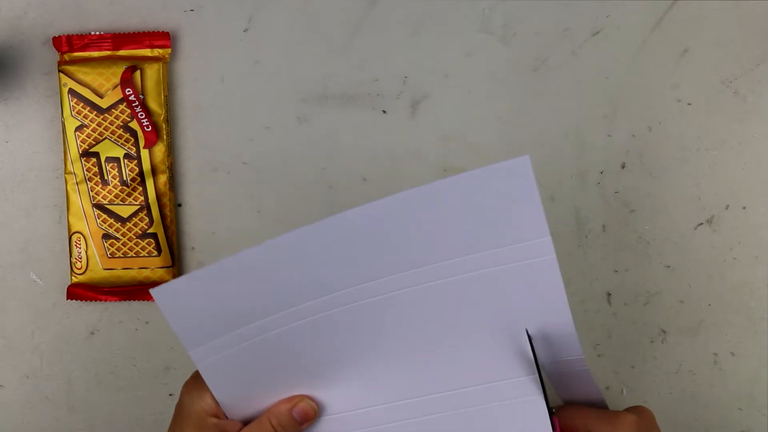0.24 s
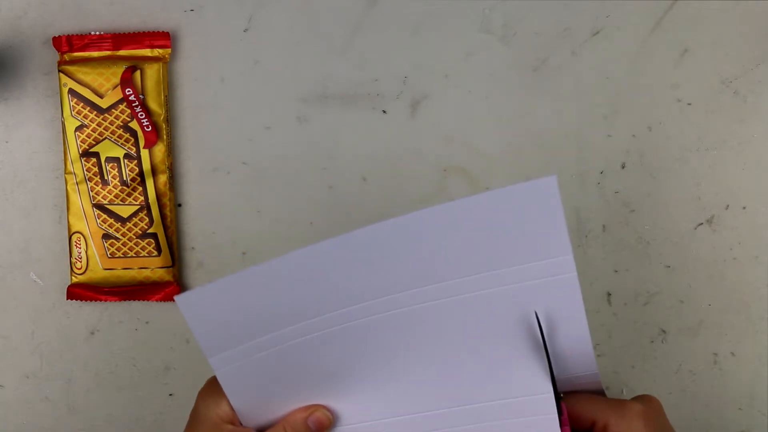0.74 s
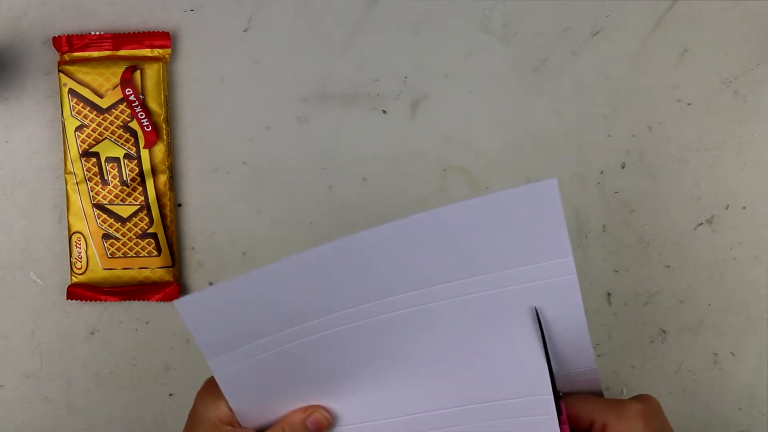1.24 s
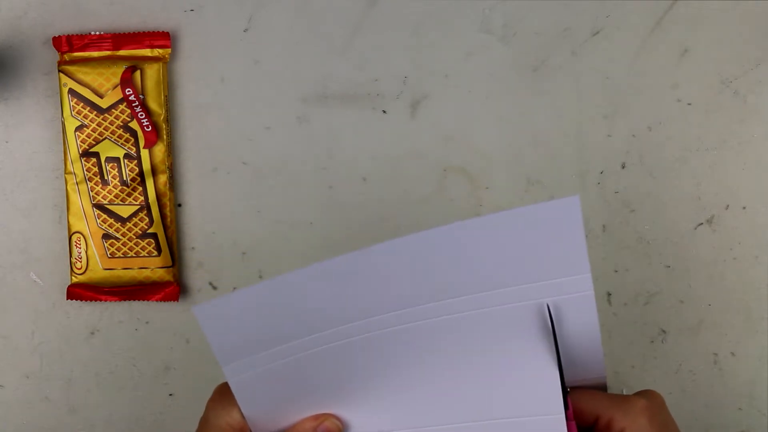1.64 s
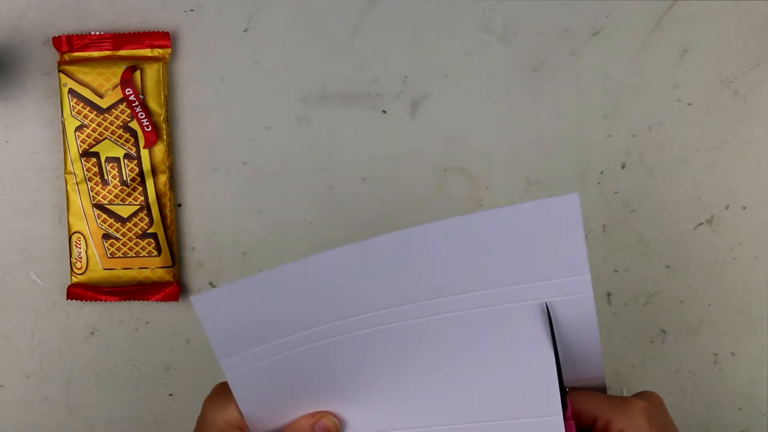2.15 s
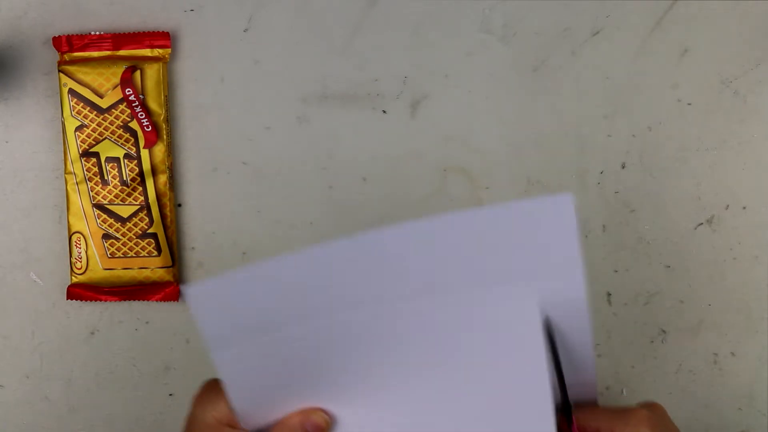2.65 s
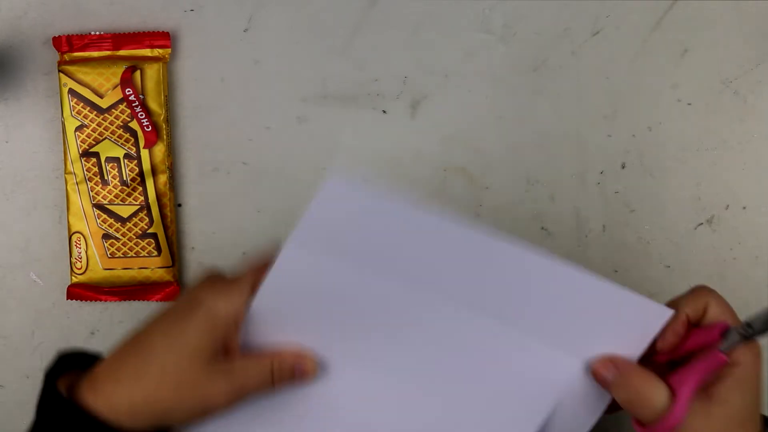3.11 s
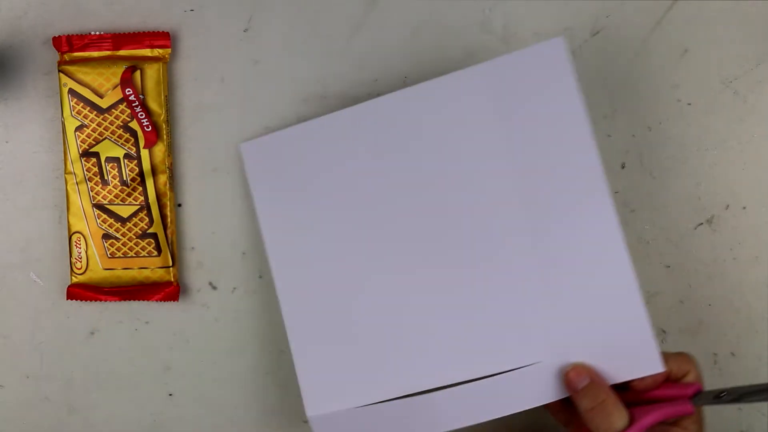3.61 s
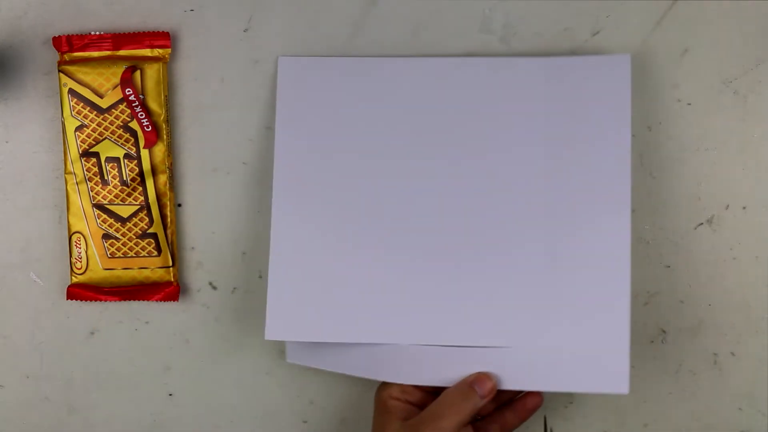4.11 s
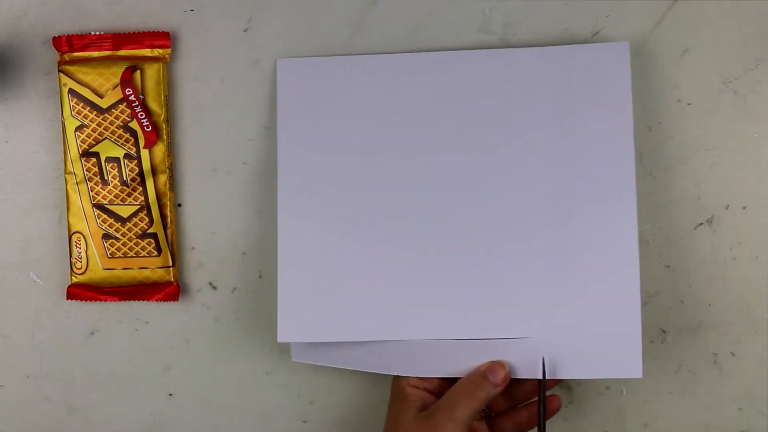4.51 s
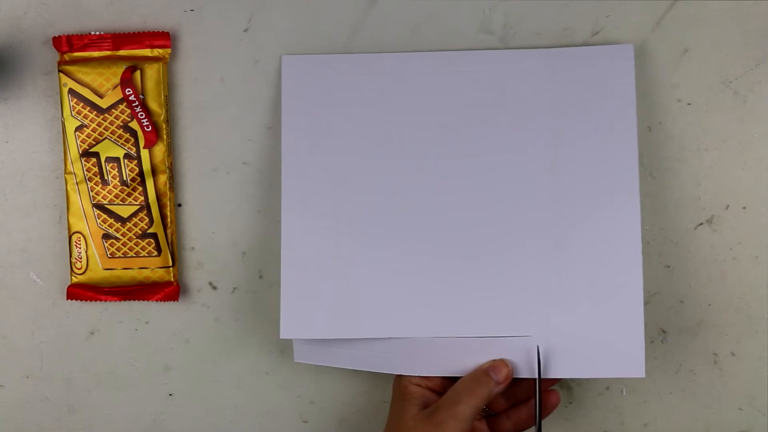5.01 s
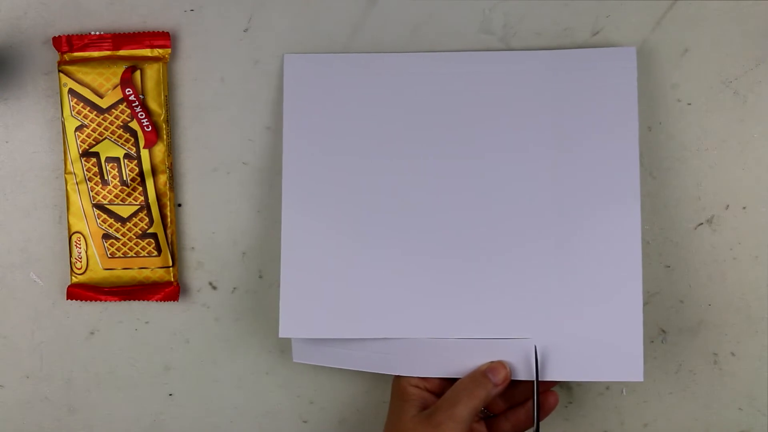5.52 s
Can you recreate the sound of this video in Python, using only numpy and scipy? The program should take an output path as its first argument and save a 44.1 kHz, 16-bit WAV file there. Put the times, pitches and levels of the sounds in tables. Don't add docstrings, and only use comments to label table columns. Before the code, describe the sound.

In a small quiet room, scissors cut stiff paper close to a stereo microphone. Faint scrapes and catches come first, then a rapid, dry creaking run, several separate snips and one much louder closing snap. Afterwards the sheet is turned with soft rustles and light ticks, then only low hiss and faint hum remain.

```python
import sys
import numpy as np
from scipy import signal
from scipy.fft import rfft, irfft, next_fast_len
from scipy.io import wavfile
from scipy.ndimage import uniform_filter1d

SR = 44100
rng = np.random.default_rng(int(sys.argv[2]) if len(sys.argv) > 2 else 0)


def undo_db(level):
    steps = np.asarray(level, float) / 20
    return 10 ** steps


def int16_out(signal):
    q = np.round(np.clip(np.atleast_2d(signal).T, -1, 1) * 32767)
    wavfile.write(sys.argv[1], SR, q.astype(np.int16))


N = 254016

# start_s, level_db (peak), pitch_hz (strongest mode), sharpness_db, length_s
CREAK_EVENTS = [(0.789, -26, 636, -16.5, 0.0037), (0.809, -24, 644, -13, .001),
                (0.814, -19.5, 674, -14, 0.0066), (0.834, -24.5, 697, -6, .003),
                (0.866, -26.5, 695, -11, 0.0018), (0.898, -27.5, 900, -10, 0.0056),
                (0.93, -26, 730, -7.5, 0.0011), (0.956, -21.5, 720, -13, 0.0051),
                (1.013, -20, 715, -9.5, 0.0054), (1.046, -19.5, 696, -28, .0019),
                (1.061, -21.5, 636, -7, 0.0039), (1.096, -16, 664, -10, .0015),
                (1.1005, -16, 800, -10, .002), (1.119, -20, 800, -18, 0.0032),
                (1.125, -21, 659, -7, 0.0036), (1.148, -16.5, 650, -5, 0.0035),
                (1.155, -21, 800, -16.5, .002), (1.162, -20.5, 645, -6, 0.0034),
                (1.174, -28.5, 940, -10, 0.0018)]
# start_s, level_db, pitch_hz, sharpness_db, length_s
SNIP_EVENTS = [
    (1.789, -20, 720, -12.5, 0.0071),
    (1.964, -17.5, 525, -11, .0045),
    (2.158, -19, 471, -9.5, 0.0062),
    (2.221, -22.5, 471, -9, 0.0056),
    (2.326, -18, 640, -9.5, .0025),
]
# start_s, level_db, pitch_hz, sharpness_db, length_s
TIPS_CLOSING = (2.4275, -8.5, 655, -13.5, .006)
# start_s, level_db, pitch_hz, #
# sharpness_db, length_s
CATCH_EVENTS = [(0.089, -34, 681, -11, 0.0053), (0.135, -31.5, 669.6, -25.5, 0.0084),
                (0.326, -41.5, 509, -21, .0024), (0.341, -31.5, 935, -18, 0.006),
                (0.381, -32, 651, -7, 0.0058), (0.393, -24, 596, -0.5, 0.0051),
                (0.611, -37, 650, -8, 0.0034), (1.3, -39, 654, -14, .004), (1.318, -34.5, 700, -14, 0.0033),
                (1.329, -26, 686, 7, 0.0027), (1.822, -28, 600, -13, .005),
                (1.989, -27.5, 490, -10, 0.0037), (2.009, -28.5, 466, -11.5, .0055)]
# start_s, level_db, pitch_hz, sharpness_db
FLICK_EVENTS = [
    (1.3618, -19.5, 664, -13),
    (2.672, -39, 635, -11),
    (2.699, -37, 700, -14),
    (3.143, -34.5, 962, -2),
    (3.534, -38, 1050, -37),
    (3.705, -36.5, 974, -19),
    (3.8115, -28, 854, -1),
    (3.917, -29, 1235, -15),
]
# offset_db, slope_db_per_db
CREAK_CRACK = (-21, 0.39)
CATCH_CRACK = (-4, 1.26)
SNIP_CRACK = (1.6, 2.03)
TIPS_CRACK = (-2, .9)
FLICK_CRACK = (0.5, 1)

# start_s, rise_s, hold_s, rub_db, fizz_db
BLADE_STROKES = [(0.009, .002, .005, -65, -11), (0.081, 0.011, 0.074, -41, -25),
                 (0.257, 0.033, 0.0046, -48.5, -32), (0.318, 0.033, 0.0077, -40, -32),
                 (0.374, 0.017, 0.0023, -22, -15), (0.426, 0.034, 0.057, -41, -0.5),
                 (0.51, 0.013, 0.057, -39.5, -4.5), (0.603, 0.01, .004, -43, -0.5),
                 (0.8, .04, .03, -50, -3), (0.94, .016, .01, -54, -5), (1.01, 0.0043, 0.00092, -29, -15),
                 (1.03, .13, .002, -34.5, -4), (1.315, 0.013, .08, -34.5, -7.5),
                 (1.399, 0.024, 0.0023, -30, -14), (2.656, 0.017, .005, -50, 3.5),
                 (2.693, 0.0088, 0.058, -40.5, -5)]
# start_s, rise_s, hold_s, rub_db, fizz_db
FINGER_RUSTLES = [(2.903, 0.045, .08, -77.5, 10.5), (3.086, 0.017, 0.033, -46.5, -6.5),
                  (3.148, 0.059, .002, -41, -3), (3.29, .02, .005, -54, 1), (3.379, 0.055, .005, -63, 0.5),
                  (3.45, 0.032, .005, -53.5, -12.5), (3.613, 0.012, 0.076, -55.5, -3)]
# start_s, rise_s, hold_s, rub_db, fizz_db
FINGER_GRIPS = [(3.526, .006, .006, -48, -16), (3.727, 0.039, 0.0017, -39.5, -3.5),
                (3.8, 0.0088, 0.054, -49, -5.5), (3.917, .003, .008, -41, -18),
                (3.98, .005, .02, -40.5, -11.5), (4.03, 0.013, 0.036, -63.5, -2)]
# start_s, rise_s, hold_s, rub_db, fizz_db
SHEET_WOBBLES = [(0.325, 0.016, 0.017, -62, -20), (0.38, 0.0097, .025, -60, -18),
                 (0.461, 0.011, .015, -59, -20), (3.138, .015, 0.027, -57, -18),
                 (3.22, .02, 0.068, -63, -20)]
# rise_db, release_db_per_s, mid_db, mid_per_fizz_db, flap_db, flap_per_fizz_db
BLADE_TOUCH = (26.5, 620, -2.5, 0.42, -11.5, 2.3)
LOOSE_TOUCH = (19, 446, 2, 0.87, -4, 0.4)
TAUT_TOUCH = (25.5, 797, 1.5, 0.46, -5, 0.6)
WOBBLE_TOUCH = (20, 500, -20, .1, 10, -0.04)

# pitch_hz, width_hz, level_db
FLAP_MODES = [(191, 21, -1.5), (256, 35, -2.5), (374.5, 42, 3.5)]
LOW_MODES = [(423, 44, -9), (471, 74, -1.5), (526.7, 73, -5.5), (580, 97, -13), (627.7, 74, 0),
             (697, 91, 1), (800, 84, -2.5), (934.6, 70, -0.5), (1030.5, 95, 1), (1037, 53, -4),
             (1235, 94, -1)]
MID_MODES = [(1400, 190, -1.5), (1656, 110, -3), (1804, 100, -4), (2073, 100, -2), (2344, 140, -3.5),
             (2230, 170, 1), (2460, 120, -6.5), (2757, 200, -1.5)]
# pitch_hz, level_db
FIBRE_COLOUR = [(2400, -25), (3100, 3.5), (3500, 4), (4200, -1.5), (4900, -4.5), (5800, -8), (7000, -11.5),
                (8100, -8.5), (10000, -15), (13000, -23), (16000, -33)]
# start_s, level_db, decay_s
BLADE_BRUSH = (3.696, -70, .016)
# pitch_hz, width_hz, level_db
STEEL_MODES = [(10500, 250, -2), (11800, 900, -4), (13300, 1200, 0), (14800, 1200, 0)]

# pitch_hz, t60_s
ROOM_DECAY = [(250, 0.28), (700, 0.19), (2000, 0.23), (5000, 0.22), (12000, 0.28)]
# start_s, level_db
TABLE_THUDS = [(0.07, -62), (1.41, -57), (2.43, -64), (3.635, -58.5), (3.97, -65)]
# pitch_hz, level_db (per Hz)
HISS_COLOUR = [(15, -21.5), (30, -16), (50, -7), (90, -5.5), (140, -10), (190, -3), (260, -8), (600, -9),
               (1700, -13.5), (5000, -17), (10000, -21.5), (16000, -26.5)]
# pitch_hz, likeness (0 to 1)
HISS_LIKENESS = [(60, 0.8), (150, 0.48), (380, 0.064), (950, 0.0045), (2380, 0), (5980, -0.0),
                 (15000, -0.0)]


def evened(x):
    return x / np.sqrt(np.mean(x ** 2) + 1e-20)


def peaked(x):
    return x / np.max(abs(x))


def read(points, hz):
    f, value = np.transpose(points)
    return np.interp(np.log(hz + 1), np.log(f + 1), value)


def add(mix, s, sound):
    part = mix[round(s * SR):][:len(sound)]
    part += sound[:len(part)]


def high_pass(x, hz):
    return signal.sosfilt(signal.butter(2, hz, "high", fs=SR, output="sos"), x)


def ring(modes, favoured_hz=None, lean_db=8.5, detune=0.0093, damping=0.92, rise_s=0.00083,
         boost_db=0., spin=np.pi):
    hz, width, db = np.transpose(modes)[:, :, None]
    hz = hz * (1 + detune * rng.standard_normal(hz.shape))
    if favoured_hz:
        apart = abs(np.log2(hz / favoured_hz))
        db = db - lean_db * apart + boost_db * (apart == apart.min())
    t = np.arange(2500) / SR
    phase = spin * np.arange(len(modes))[:, None]
    soft = 1 - np.exp(-(t / rise_s) ** 2)
    decay = np.exp(-np.pi * damping * width * t)
    return soft * (undo_db(db) * decay * np.sin(2 * np.pi * hz * t + phase)).sum(0)


def fizzed(x, dull_db=0.):
    size = next_fast_len(len(x) + 256)
    hz = np.fft.rfftfreq(size, 1 / SR)
    octaves_up = np.log2(np.maximum(hz / 4500, 1))
    colour = undo_db(read(FIBRE_COLOUR, hz) - dull_db * octaves_up)
    return irfft(rfft(x, size) * colour, size)[:len(x)]


def grains(length, per_s, spread_db):
    sign, chance, size = rng.random((3, length))
    snaps = chance < per_s / SR
    return np.sign(sign - .5) * snaps * undo_db(-spread_db * np.log(1 - .99 * size))


def slip(row, crack, cluster_db, dull_db, flap_db, valley_db, bite, damping, spin=np.pi):
    s, db, hz, sharp_db, length_s = row
    crack_db = crack[0] + crack[1] * sharp_db
    t = np.arange(2000) / SR
    fade = np.exp(-t / max(length_s, 2e-4))
    cluster = grains(len(t), 3000, 3.2) * fade
    cluster = undo_db(cluster_db) * cluster / np.linalg.norm(cluster + 1e-9)
    snap = signal.unit_impulse(len(t))

    heave = snap + 0.43 * cluster
    flap = peaked(signal.fftconvolve(heave, ring(FLAP_MODES)))
    low_ring = ring(LOW_MODES, hz, damping=damping, boost_db=5.0, spin=spin)
    low = peaked(signal.fftconvolve(heave, low_ring))
    mid_ring = ring(MID_MODES, 2180, valley_db, rise_s=0.00038, detune=.035,
                    damping=1.4 * damping, spin=spin)
    mid = peaked(signal.fftconvolve(bite * snap + cluster, mid_ring))

    tearing = np.roll(bite ** 2 * snap + cluster, 30)
    tearing = tearing + undo_db(cluster_db - 8.5) * fade * rng.standard_normal(len(t))
    crackle = peaked(np.pad(fizzed(tearing, dull_db), (0, 2499)))
    sound = low + undo_db(sharp_db + 8.5) * mid + undo_db(crack_db + 11.5) * crackle + undo_db(flap_db) * flap
    return s - .0007, undo_db(db) * peaked(sound)


def creaks(sheet):
    for rows, crack in ((CREAK_EVENTS, CREAK_CRACK), (CATCH_EVENTS, CATCH_CRACK)):
        for row in rows:
            add(sheet, *slip(row, crack, cluster_db=-0.5, dull_db=11.5, flap_db=-27.5,
                             valley_db=15.0, bite=0.19, damping=0.78))


def snips(sheet):
    for row in SNIP_EVENTS:
        add(sheet, *slip(row, SNIP_CRACK, cluster_db=4.5, dull_db=1.0, flap_db=-21.0,
                         valley_db=4.0, bite=0.72, damping=1.0))
    add(sheet, *slip(TIPS_CLOSING, TIPS_CRACK, cluster_db=6., dull_db=1.5, flap_db=-19.,
                     valley_db=1.5, bite=0.45, damping=1.1))


def flicks(sheet):
    length_s = 0.0019
    for row in FLICK_EVENTS:
        add(sheet, *slip((*row, length_s), FLICK_CRACK, cluster_db=-5., dull_db=0., flap_db=-25.,
                         valley_db=0., bite=1, damping=3.5, spin=np.pi / 2))


def pressure(row, touch):
    start, rise, hold, db, fizz_db = row
    rise_db, release_db_per_s, mid_db, mid_slope, flap_db, flap_slope = touch
    first, top = start - .008, start + max(rise, .001)
    go = top + max(hold, .0005)
    last = first + .2701
    end_db = db - release_db_per_s * (last - go)
    levels = [(first, db - 2 * rise_db), (start, db - rise_db), (top, db), (go, db), (last, end_db)]
    mid_db, flap_db = mid_db + mid_slope * fizz_db, flap_db + flap_slope * fizz_db
    return [(s, level_db, mid_db, fizz_db, flap_db) for s, level_db in levels]


def stroke(row, touch, favoured_hz, lean_db, damping):
    s, *columns = np.transpose(pressure(row, touch))
    t = np.arange(s[0], s[-1], 1 / SR)
    rub_db, mid_db, fizz_db, flap_db = (np.interp(t, s, c) for c in columns)
    push = grains(len(t), 3000, 4.3) + .5 * rng.standard_normal(len(t))
    clumps = evened(uniform_filter1d(rng.standard_normal(len(t)), size=200))
    push = push * undo_db(1.8 * clumps)

    def rubbed(modes):
        total = np.zeros(len(t))
        for mode in modes:
            sign = rng.choice([-1, 1], len(t))
            answer = ring([mode], favoured_hz, lean_db, damping=damping)
            total += signal.fftconvolve(push * sign, answer)[:len(t)]
        return evened(total)

    sound = rubbed(LOW_MODES) + undo_db(mid_db) * rubbed(MID_MODES)
    sound = sound + undo_db(fizz_db) * evened(fizzed(push)) + undo_db(flap_db) * rubbed(FLAP_MODES)
    return s[0], undo_db(rub_db - 6) * sound * signal.windows.tukey(len(t), .05)


def blade_strokes(sheet):
    for row in BLADE_STROKES:
        add(sheet, *stroke(row, BLADE_TOUCH, 1400, lean_db=1.0, damping=0.87))


def finger_rubs(sheet):
    for row in FINGER_RUSTLES:
        add(sheet, *stroke(row, LOOSE_TOUCH, 1600, lean_db=-1.5, damping=1.9))
    for row in FINGER_GRIPS:
        add(sheet, *stroke(row, TAUT_TOUCH, 1560, lean_db=10.5, damping=3.0))


def wobbles(sheet):
    for row in SHEET_WOBBLES:
        add(sheet, *stroke(row, WOBBLE_TOUCH, 400, lean_db=5.0, damping=1.9))


def pivot(sheet):
    s, db, decay_s = BLADE_BRUSH
    brush = rng.standard_normal(4000) * np.exp(-np.arange(4000) / SR / decay_s)
    steel = signal.fftconvolve(brush, ring(STEEL_MODES, detune=0, rise_s=1e-4))
    add(sheet, s, undo_db(db) * evened(steel))


def thuds():
    t, out = np.arange(4000) / SR, np.zeros(N)
    thud_hz, decay_s = 61.4, .007
    push = peaked(t ** 2 * np.exp(-t / decay_s) * np.sin(2 * np.pi * thud_hz * t))
    for s, db in TABLE_THUDS:
        add(out, s, undo_db(db) * push)
    return out


def room(x):
    taps = np.zeros((3, 3, SR // 2))
    jitter = rng.integers(0, 20, (3, 3, (SR // 2 - 151) // 20))
    at = np.arange(150, SR // 2 - 20, 20) + jitter
    np.put_along_axis(taps, at, rng.choice([-1., 1.], at.shape), 2)
    hz, t, z = signal.stft(taps, SR, nperseg=256)
    apart = (hz / np.hypot(hz, 2500.))[:, None]
    z = np.sqrt(1 - apart ** 2) * z[:, 2:] + apart * z[:, :2]
    z = z * undo_db(-60 * t / read(ROOM_DECAY, hz)[:, None])
    tails = signal.istft(z, SR, nperseg=256)[1]
    tails = tails / np.linalg.norm(tails[0, 0])
    turn = np.pi * (30 * np.arange(N) / SR + np.arange(3)[:, None] / 3)
    fed = x * np.sqrt(2 / 3) * np.cos(turn)
    return signal.fftconvolve(fed[:, None], tails, axes=2).sum(0)[:, :N]


def hiss():
    frames, hz = N // 512 + 5, np.fft.rfftfreq(2048, 1 / SR)
    a, b, c, d = rng.standard_normal((frames, 1025, 4)).T
    same = np.clip(read(HISS_LIKENESS, hz), -1, 1)[:, None]
    left = a + 1j * b
    right = same * left + np.sqrt(1 - same ** 2) * (c + 1j * d)
    z = np.array([left, right]) * undo_db(read(HISS_COLOUR, hz))[:, None]
    noise = signal.istft(z, nperseg=2048, noverlap=1536)[1][:, :N]
    return undo_db(-60.5 + 0.04) * evened(noise)


def hum():
    hum_hz, level_db, waver_db = 100.7, -66.5, .8
    waver = evened(uniform_filter1d(rng.standard_normal(N), 1500))
    tone = np.sqrt(2) * np.sin(2 * np.pi * hum_hz * np.arange(N) / SR)
    return tone * undo_db(level_db + waver_db * waver)


def scene():
    sheet = np.zeros(N)
    for source in (creaks, snips, flicks, blade_strokes, finger_rubs, wobbles, pivot):
        source(sheet)
    sheet = high_pass(sheet, 190)
    treble = high_pass(sheet, 3000)
    lean = .12 * treble + .2 * (np.roll(treble, 3) - np.roll(treble, -3))
    direct = sheet + np.array([-lean, lean])
    return direct + undo_db(-2.5) * room(sheet) + thuds() + hiss() + hum()


def top_cut(x):
    return signal.sosfilt(signal.butter(12, 16450, fs=SR, output="sos"), x)


def record(dry):
    edge = signal.firwin(511, 15850, window=("kaiser", 9), fs=SR)
    limited = signal.oaconvolve(dry, edge[None], "same")
    return top_cut(limited)


dry = scene()
out = record(dry)
int16_out(out)
```